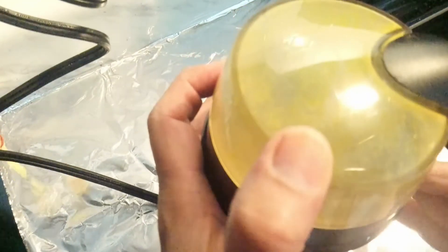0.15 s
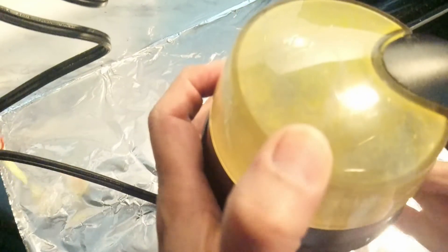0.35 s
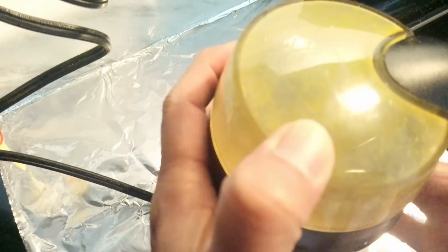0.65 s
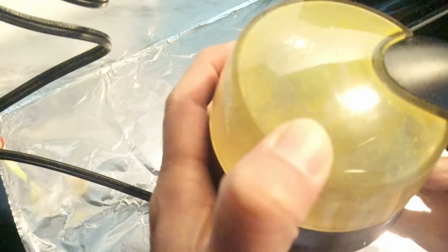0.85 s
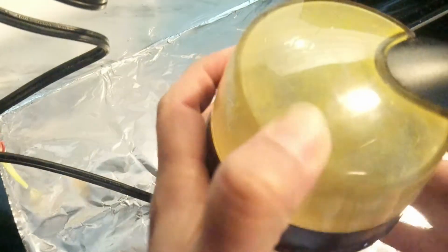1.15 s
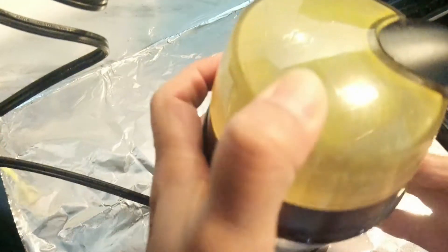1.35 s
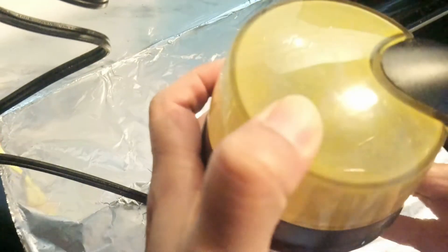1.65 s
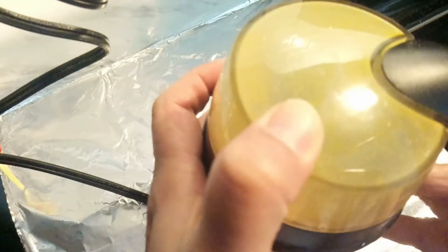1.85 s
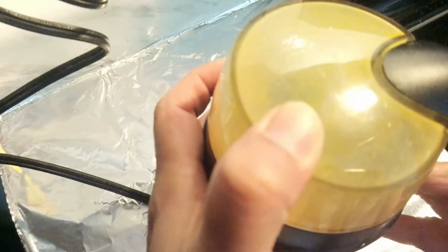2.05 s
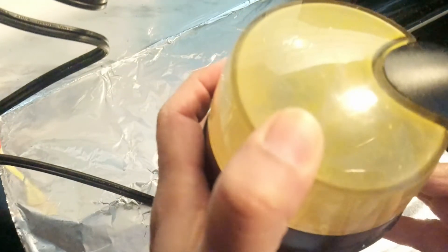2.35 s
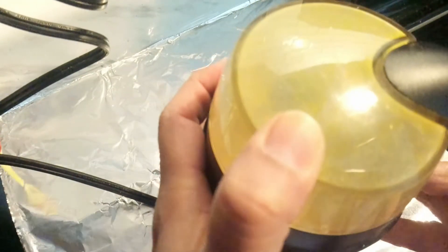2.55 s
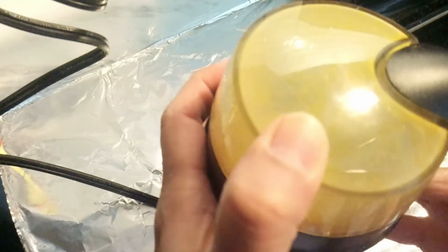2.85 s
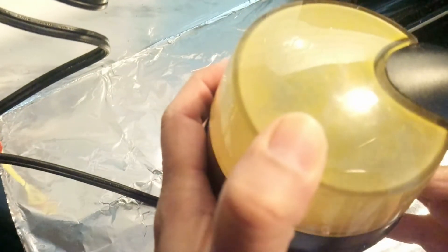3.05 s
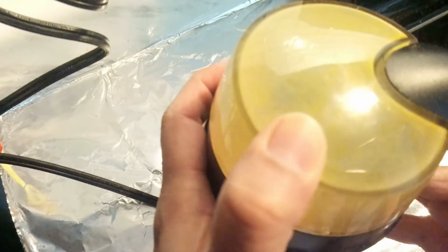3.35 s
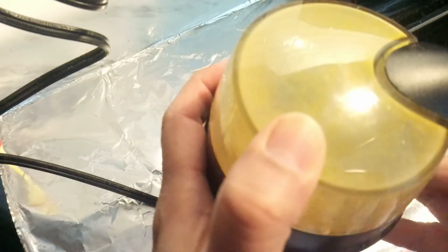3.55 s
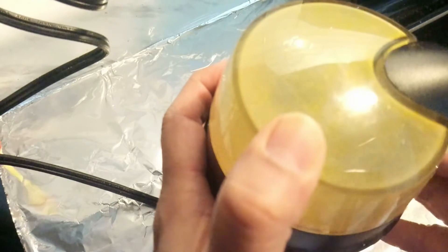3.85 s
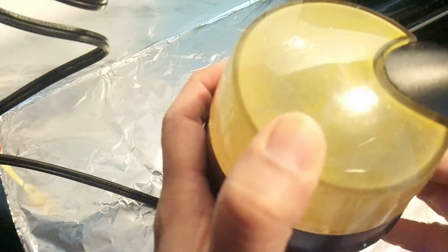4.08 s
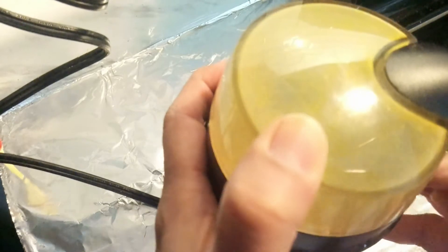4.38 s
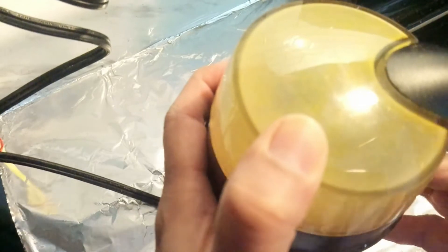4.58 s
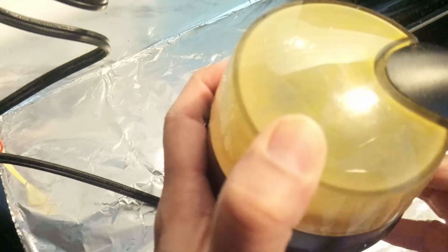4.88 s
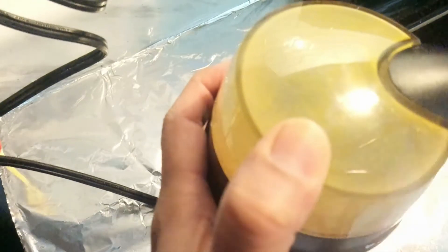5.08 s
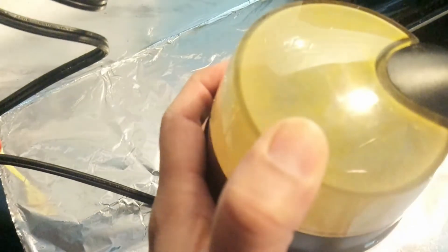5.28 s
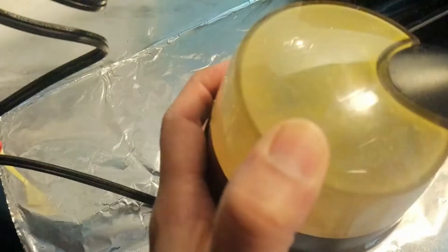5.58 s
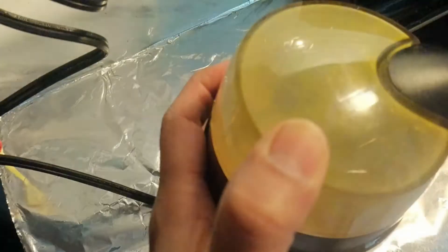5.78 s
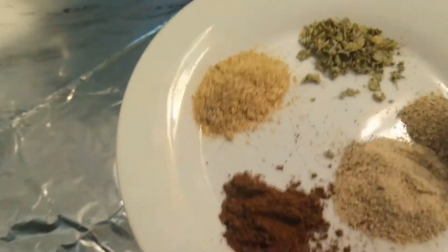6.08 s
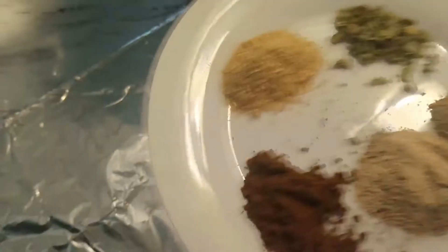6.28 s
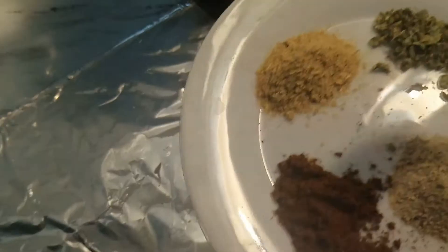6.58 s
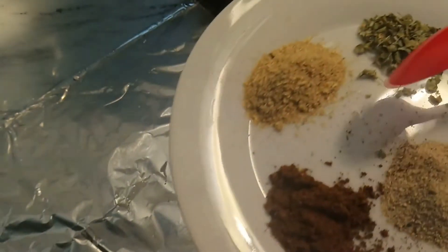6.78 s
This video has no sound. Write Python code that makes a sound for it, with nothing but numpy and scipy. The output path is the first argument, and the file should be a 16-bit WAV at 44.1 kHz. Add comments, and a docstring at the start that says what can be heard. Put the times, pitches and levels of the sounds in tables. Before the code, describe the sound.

A small electric blade grinder is heard close to a stereo microphone in a quiet kitchen. For the first 1.4 seconds it is shaken, and dry seeds tick against the plastic lid and slide across the cup. At about 1.4 seconds the motor starts with a low electric hum, a quickly rising whine and a crisp rattle of seeds over a rush of powder and air. It is released at 2.2 seconds and the pitch falls. A second pulse runs from 2.6 to 3.4 seconds, then coasts lower, with a few sharp seed clicks just after 4 seconds. A shorter third pulse runs from 4.3 to 4.7 seconds. The blades then wind down, the rattle thinning to separate ticks. At about 5.9 seconds everything cuts to silence, and a faint, low room drone fades back in until about 7 seconds.

```python
"""Seed grinder in a kitchen

Close to a stereo microphone, a small blade grinder is shaken in the hand, then pulsed three times and
left to coast. The shaft whines through the housing, the coil hums at twice the mains while switched on,
and seeds rattle in the cup. Near the end all drops to silence, then the low room drone fades back in."""
import sys
import numpy as np
from scipy import signal
from scipy.fft import rfft, irfft
from scipy.io import wavfile
from scipy.ndimage import uniform_filter1d

SR = 44100
rng = np.random.default_rng(int(sys.argv[2]) if len(sys.argv) > 2 else 0)


def materialize(psi):
    """Save the field psi as 16-bit PCM at rate SR to the path in sys.argv[1].

    A 1-D psi becomes a single channel; in a 2-D psi each row is a channel.
    """
    bounded = np.clip(np.atleast_2d(psi).T, -1, 1)
    quanta = np.round(bounded * 32767).astype(np.int16)
    wavfile.write(sys.argv[1], SR, quanta)


N = 305648
T = np.arange(N) / SR
HZ = np.maximum(np.arange(N // 2 + 1) * SR / N, 1)
SIDE = np.array([[-.5], [.5]])  # splits a right-minus-left difference between the microphones
HUM_HZ, SILENCE_S = 120, 5.86
START_DIP_S = 0.16  # overtones and rush are weak just after each press


def undb(db):
    """Gain of a dB value."""
    return 10 ** (np.asarray(db) / 20)

def unit(x):
    """Scale to rms 1."""
    return x / np.sqrt(np.mean(x ** 2))

def curve(table):
    """A (time, value) table as a curve, and a gate open only inside its span."""
    times, values = np.transpose(table)
    gate = uniform_filter1d(1. * ((T >= times[0]) & (T < times[-1])), size=160)
    return np.interp(T, times, values), gate

def colour(stereo, table):
    """Shape a stereo spectrum by (Hz, left dB, right dB) points; joint rms 1."""
    hz, *channels = np.transpose(table)
    gains = undb([np.interp(np.log(HZ), np.log(hz), db) for db in channels])
    return unit(irfft(rfft(stereo) * gains, N))

def stereo_noise(alike_hz):
    """Noise at two microphones, alike below alike_hz and unrelated above."""
    mid, side = rfft(rng.standard_normal((2, N)))
    alike = 1 / (1 + (HZ / alike_hz) ** 2)
    return irfft(mid * np.sqrt(1 + alike) - 2 * SIDE * side * np.sqrt(1 - alike), N)

def waver(per_s):
    """Smoothed random steps, rms 1."""
    hold = int(SR / per_s)
    steps = np.repeat(rng.standard_normal(N // hold + 1), hold)
    return unit(uniform_filter1d(uniform_filter1d(steps, hold), hold)[:N])


# Room tone spectrum: (frequency [Hz], relative level [dB])
ROOM_SPECTRUM = [(20, -21.5), (40, -37.5), (60, -24.5), (120, -9), (150, -12.5), (250, -6), (420, -15.5),
                 (500, -20.5), (1120, -30), (1240, -35.5), (3000, -42), (6200, -41.5), (8000, -57),
                 (13500, -57), (15000, -47), (16400, -58.5)]
# Its balance at the microphones: (frequency [Hz], left minus right [dB])
ROOM_PAN = [(30, -9.5), (200, -2), (700, -2), (2000, -1), (8000, 1), (16000, -1)]
# Wavering bands in the room: (centre [Hz], width [Hz], opening level [dB])
ROOM_DRONES = [(188.8, 20, -52), (236, 25, -66), (412, 4.1, -66.5), (1121, 40, -74.5), (1740, 10, -85),
               (4400, 10, -85)]
# Room tone, dropping out and fading back in: (time [s], level [dB])
ROOM_LEVEL = [(0, -49.5), (5.84, -48), (5.86, -77), (5.89, -101), (5.925, -86), (5.95, -63.5), (6.02, -59),
              (6.04, -56.5), (6.2, -49), (6.93, -51.5)]

def kitchen():
    """Appliance drone in the room: dull noise, wavering bands and, after the silence, a thin tone."""
    level_db, _ = curve(ROOM_LEVEL)
    opening_db = level_db[0]
    hz, db = np.transpose(ROOM_SPECTRUM)
    pan_hz, pan_db = np.transpose(ROOM_PAN)
    lean_db = np.interp(np.log(hz), np.log(pan_hz), pan_db) / 2
    room = colour(stereo_noise(300), np.transpose([hz, db + lean_db, db - lean_db]))
    for centre, width, band_db in ROOM_DRONES:
        band = irfft(rfft(rng.standard_normal(N)) / (1 + ((HZ - centre) / width * 2) ** 2), N)
        room += undb(band_db - opening_db + 3 * SIDE) * unit(band)
    thin_tone = undb(-84 - opening_db) * np.sqrt(2) * np.sin(2 * np.pi * 3327 * T)
    return (room + (T > SILENCE_S) * thin_tone) * undb(level_db)


# Colour of seed impacts, close up: (frequency [Hz], left [dB], right [dB])
SEED_COLOUR = [(1500, -15, -18), (3240, -8.5, -9.5), (4380, -2, -6), (6410, -3.5, 6), (7670, -13.5, -2.5),
               (9000, -22, -9), (13000, -27, -13), (15080, -7.5, 0), (16600, -24.5, -25)]

def seed_hits(per_s, spread_db):
    """Dense impacts of uneven size; each microphone hears its own fine pattern of the same bursts."""
    strikes = rng.random(N) < per_s / SR
    size_db = np.minimum(spread_db * rng.exponential(size=N), 17)
    bursts = signal.lfilter([1], [1, -np.exp(-1 / (0.0035 * SR))], strikes * undb(size_db))
    return colour(bursts * rng.standard_normal((2, N)), SEED_COLOUR)


# Single seeds on the lid: (time [s], level [dB], 60 dB decay [s], knock relative to tick [dB])
SEED_TICKS = [(0.021, -38, 0.14, -2.5), (0.3274, -45, 0.23, 3.5), (0.525, -60, 0.26, 9),
              (0.584, -42.5, 0.096, 6.5), (0.604, -38, 0.12, -18), (0.8986, -28.5, 0.16, -36),
              (0.925, -35, 0.089, -16), (1.034, -37.5, 0.33, -5), (1.0735, -28, 0.11, -8),
              (1.158, -20.5, 0.12, -43), (1.2017, -38.5, 0.22, -8), (1.2444, -28, 0.075, -16),
              (1.273, -23, 0.16, -40), (1.376, -35, 0.092, -9), (1.419, -20, 0.16, -20),
              (4.0907, -20.5, 0.092, -29), (4.1896, -20.5, 0.1, -26), (4.216, -20.5, 0.13, -27),
              (4.2603, -14.5, 0.11, -14), (4.3654, -29, 0.11, -3), (5.4222, -19.5, 0.08, -14),
              (5.445, -35, 0.098, -18), (5.527, -26.5, 0.3, -5.5), (5.6274, -32.5, 0.14, -1),
              (5.7434, -27, 0.07, -6), (5.8358, -22, 0.031, -28), (5.8484, -50, 0.093, -23)]
# The heap sliding across the cup: (crest time [s], level [dB], swell [s], fade [s])
HEAP_SLOSHES = [(.36, -61, 0.074, 0.93), (.65, -71, .1, 0.28), (0.747, -28, 0.045, 0.06),
                (.8, -59.5, .1, 0.27), (.99, -49, 0.044, 0.075), (1.098, -27, 0.027, 0.069),
                (1.119, -28, 0.035, 0.047), (1.285, -38, 0.027, 0.11), (1.32, -24, 0.046, 0.043),
                (1.39, -41, 0.066, 0.23)]
# Colour of the lid's knock: (frequency [Hz], left [dB], right [dB])
LID_COLOUR = [(900, -16, -12.5), (1920, -9, -9), (2580, 3, 2), (3360, -7.5, -9.5), (6030, -28.5, -37)]

def loose_seeds():
    """Single seeds tick on the lid and die away; the shaken heap swells and fades."""
    attack_s, click_s, crest_db = 0.0021, 0.022, 9
    ticks, knocks, heap = np.zeros((3, N))
    for start, db, t60, knock_db in SEED_TICKS:
        age = T - start
        ring = np.clip(age / attack_s, 0, 1) * undb(db - crest_db - 60 * np.clip(age / t60, 0, 3))
        tick = ring * (1 + undb(3 - 60 * np.clip(age / click_s, 0, 2)))  # first contact tops the ring
        ticks = np.hypot(ticks, tick)
        knocks = np.hypot(knocks, tick * undb(knock_db))
    for crest, db, swell, fade in HEAP_SLOSHES:
        from_crest = np.maximum((crest - T) / swell, (T - crest) / fade)
        heap = np.hypot(heap, undb(db - 26.4 * np.minimum(from_crest, 6)))
    seeds = (ticks + heap) * seed_hits(per_s=6600, spread_db=2.5)
    lid = (knocks + undb(-22.5) * heap) * colour(stereo_noise(1500), LID_COLOUR)
    return (T < SILENCE_S) * (seeds + lid)


# Seed rattle while the blades turn: (time [s], level [dB])
RATTLE_LEVEL = [(1.41, -56), (1.42, -23.5), (1.63, -24), (1.67, -30.5), (1.72, -27.5), (1.85, -29),
                (2.16, -33.5), (2.47, -31.5), (2.56, -28.5), (2.7, -26.5), (2.93, -30.5), (3.0, -27),
                (3.1, -31.5), (3.4, -30), (3.52, -27.5), (4.04, -32.5), (4.24, -38.5), (4.28, -28),
                (4.4, -30), (4.54, -27), (4.75, -31), (4.88, -26.5), (5.04, -27.5), (5.2, -31.5),
                (5.27, -31), (5.45, -32.5), (5.69, -39), (5.84, -44.5)]

def rattle():
    """Seeds strike the lid in flurries."""
    level_db, gate = curve(RATTLE_LEVEL)
    flutter_db = 0.5 * waver(16) + 0.83 * waver(45)
    return gate * undb(level_db + flutter_db) * seed_hits(per_s=2500, spread_db=4.87)


# Switch presses: (on [s], off [s], inrush above the running hum [dB])
SWITCH_PRESSES = [(1.428, 2.158, 10.5), (2.601, 3.402, 10), (4.259, 4.74, 12)]

def switch_on():
    """1 while the current flows, 0 while it is off, with short ramps between."""
    attack_s, release_s = 0.013, 0.033
    return sum(np.clip(np.minimum((T - on) / attack_s, 1 + (off - T) / release_s), 0, 1)
               for on, off, _ in SWITCH_PRESSES)

def after_press(fade_s):
    """1 at each press, dying away over fade_s."""
    return sum((T >= on) * np.exp(-np.maximum(T - on, 0) / fade_s) for on, _, _ in SWITCH_PRESSES)

def coil():
    """Magnetic hum at twice the mains, with a weak octave; loudest as the current rushes in."""
    inrush_db, inrush_s = np.zeros(N), 0.064
    for on, _, db in SWITCH_PRESSES:
        inrush_db[T >= on] = db * np.exp(-(T[T >= on] - on) / inrush_s)
    level = switch_on() ** 2 * undb(-38.5 + inrush_db + 1.5 * waver(25) + 1.6 * SIDE)
    phase = 2 * np.pi * HUM_HZ * T
    return np.sqrt(2) * level * (np.sin(phase + .3 * SIDE) + undb(-11) * np.sin(2 * phase))

def shudder():
    """The body shudders in the hand, kicking at each press."""
    _, gate = curve(RATTLE_LEVEL)
    level_db = -63 + 12 * after_press(fade_s=.2) - 3 * (1 - switch_on()) + 4 * waver(28)
    rumble = [(15, -9.5, -7), (30, 1.5, 8), (45, -12.5, -7.5), (70, -12, -7), (110, -21, -25)]
    return gate * undb(level_db) * colour(stereo_noise(60), rumble)


# Colour of the rush in the cup: (frequency [Hz], left [dB], right [dB])
RUSH_COLOUR = [(99.2, -12.5, -6.5), (249, -9.5, -3.5), (470, -17, -1), (981, -2, -0.5), (1390, 1.5, 4.5),
               (1950, 3.5, 3.5), (3240, 2.5, 3), (4600, 0, 5), (7900, -29, -13)]
# The rush grows with speed: (shaft speed [Hz], base level [dB])
RUSH_LEVEL = [(30, -42), (60, -40.5), (90, -33), (130, -32), (170, -32.5), (200, -30.5), (220, -30.5)]

def rush(shaft_hz):
    """Powder and air rush round the cup, weaker and thinner once the current is off."""
    _, gate = curve(RATTLE_LEVEL)
    coasting_db = -4 * (1 - switch_on())
    level_db = np.interp(shaft_hz, *np.transpose(RUSH_LEVEL)) + coasting_db
    level_db += 1.5 * waver(14) - 7 * after_press(START_DIP_S)
    air = colour(stereo_noise(500), RUSH_COLOUR)
    lows = irfft(rfft(air) / (1 + (HZ / 1100) ** 4), N)
    return gate * undb(level_db) * (air - lows * (1 - undb(coasting_db)))


# Housing modes at the microphones: (centre [Hz], width [Hz], left gain [dB], right gain [dB])
HOUSING_MODES = [(265, 82, 8.5, 10), (570, 100, -9.5, -43), (816, 330, 0.5, -11.5), (1314, 230, 8.5, -7),
                 (1613, 450, -8, 3.5), (1746, 40, 11, 5.5), (2100, 140, -1, 3)]

def housing(vibration, top_hz=2050):
    """The housing lifts overtones that sweep through its modes and passes little above top_hz."""
    response = 0
    for i, (centre, width, left_db, right_db) in enumerate(HOUSING_MODES):
        gains = np.array([[undb(left_db)], [undb(right_db) * (-1) ** i]])  # right polarity alternates
        response += gains / (1 + 1j * (HZ / centre - centre / HZ) * centre / width)
    return irfft(rfft(vibration) * response / (1 + (HZ / top_hz) ** 8), N)


# Overtones of the shaft: (multiple of shaft speed, relative level [dB])
SHAFT_OVERTONES = [(3, 1.5), (4, 0.5), (5, -4.5), (6, -1), (7, -1.5), (8, -3.5), (9, -4), (10, -4.5),
                   (11, -0.5), (12, -7), (13, -4.5), (14, -6.5), (16, -5), (18, -5)]

def overtones(angle, even_db, odd_db):
    """Even overtones come from the two blades, odd ones from imbalance."""
    dip_db = -8 * after_press(START_DIP_S)
    vibration = np.zeros(N)
    for k, db in SHAFT_OVERTONES:
        level_db = db + dip_db + (odd_db if k % 2 else even_db) + 3 * waver(25)
        vibration += undb(level_db) * np.sin(k * angle + k * k + .45 * waver(40))
    return vibration


# The blade tone reaches the left microphone late: (frequency [Hz], lag [rad])
BLADE_MIC_LAG = [(250, .2), (310, 0.94), (370, 2.35), (400, 1.74), (430, 1.27)]

def blades(angle, shaft_hz, db, pan_db):
    """Two blade passes a turn; weaker while the motor pulls, most of all just after a press."""
    level_db = db - 3.5 * switch_on() - 3.5 * after_press(fade_s=.06) + 1.3 * waver(25)
    lag = np.interp(2 * shaft_hz, *np.transpose(BLADE_MIC_LAG))
    return undb(level_db - pan_db * SIDE) * np.sin(2 * angle + SIDE * lag)

def commutator(angle, db, pan_db, bars=20, mic_lag_rad=1.7):
    """The commutator bars whine as they pass, more weakly once the current is off."""
    level_db = db - 3 * (1 - switch_on()) + 2.2 * waver(20)
    return undb(level_db - pan_db * SIDE) * np.sin(bars * angle + .4 * waver(60) + SIDE * mic_lag_rad)


# A quick then slow climb at each press, a near-even coast after: (time [s], shaft speed [Hz])
SHAFT_SPEED = [(1.42, 101.1), (1.48, 122), (1.58, 160.2), (1.67, 175.8), (1.84, 200.4), (1.99, 209.1),
               (2.16, 214.8), (2.42, 166.4), (2.6, 130.3), (2.71, 174.5), (2.79, 190), (2.91, 201.3),
               (3.06, 211.8), (3.23, 216.3), (3.38, 219.8), (3.65, 165.5), (3.94, 110.3), (4.25, 61.1),
               (4.3, 104.6), (4.36, 140.6), (4.47, 180.3), (4.58, 196.8), (4.735, 209.1), (4.96, 165),
               (5.2, 121), (5.39, 90.5), (5.6, 55.7), (5.84, 27.85)]
# Base levels of the rotor's tones, close up: (shaft speed [Hz], shaft [dB], blades [dB],
# blades left minus right [dB], even overtones [dB], odd overtones [dB], commutator [dB],
# commutator left minus right [dB])
ROTOR_LEVELS = [(41.5, -75, -62, 2, -81, -87, -79, 2), (51.57, -73, -39.5, 0, -59, -75, -74.5, 3.5),
                (64.73, -77.5, -62, -15, -53, -79, -75.5, -3), (83.94, -77, -45, -3, -57, -70, -61.5, 0),
                (92.8, -71.5, -31, -4, -46, -78.5, -49.5, 6), (121.5, -67, -27, -0.5, -42, -66, -49.5, 9),
                (145.8, -62.5, -31.5, -5.5, -45.5, -77.5, -49, 6),
                (165, -68, -26.5, -0.5, -48, -55, -62, 3.5), (181, -42, -30.5, 4.5, -47, -49, -42.5, 1.5),
                (193, -41.5, -36.5, 7.5, -42, -41.5, -46.5, 18.5),
                (199, -40, -37, -15.5, -42, -40.5, -40, -20), (209.2, -42, -30, -10, -45, -41.5, -43.5, 11),
                (216.2, -40.5, -35, -12, -41, -41, -41, 26.5)]

def rotor(shaft_hz):
    """Tones on multiples of the shaft speed; the pull of the coil pulses shaft and commutator."""
    speeds, *columns = np.transpose(ROTOR_LEVELS)
    levels = [np.interp(shaft_hz, speeds, column) for column in columns]
    shaft_db, blade_db, blade_pan_db, even_db, odd_db, whine_db, whine_pan_db = levels
    angle = 2 * np.pi * np.cumsum(shaft_hz) / SR
    throb = 1 + 0.13 * switch_on() * np.sin(2 * np.pi * HUM_HZ * T)
    shaft = undb(shaft_db + 4 * waver(25) + 1.6 * SIDE) * np.sin(angle)
    blade_tone = blades(angle, shaft_hz, blade_db, blade_pan_db)
    whine = commutator(angle, whine_db, whine_pan_db)
    body = housing(overtones(angle, even_db, odd_db))
    return np.sqrt(2) * (throb * (shaft + whine) + blade_tone + body)


def scene():
    """The grinder close to the microphone, the kitchen behind it."""
    shaft_hz, turning = curve(SHAFT_SPEED)
    grinder = turning * rotor(shaft_hz) + coil() + shudder() + rush(shaft_hz)
    return grinder + rattle() + loose_seeds() + kitchen()

def record(dry, top_hz=15900):
    """The stereo microphone's chain cuts the top steeply."""
    return signal.sosfilt(signal.ellip(10, .2, 80, top_hz, fs=SR, output="sos"), dry)


dry = scene()
out = record(dry)
materialize(out)
```